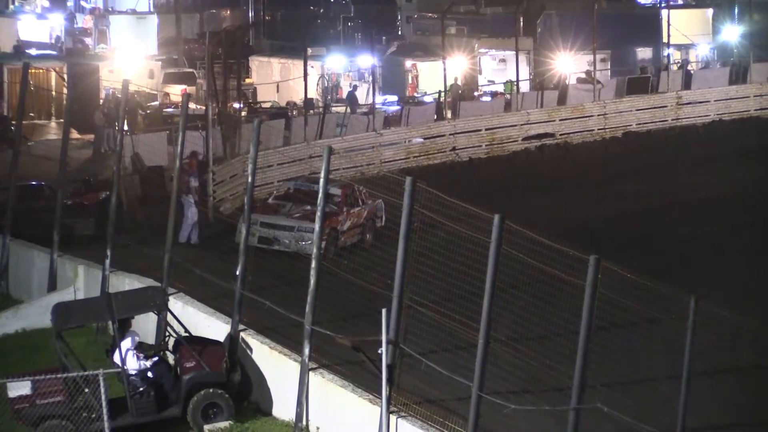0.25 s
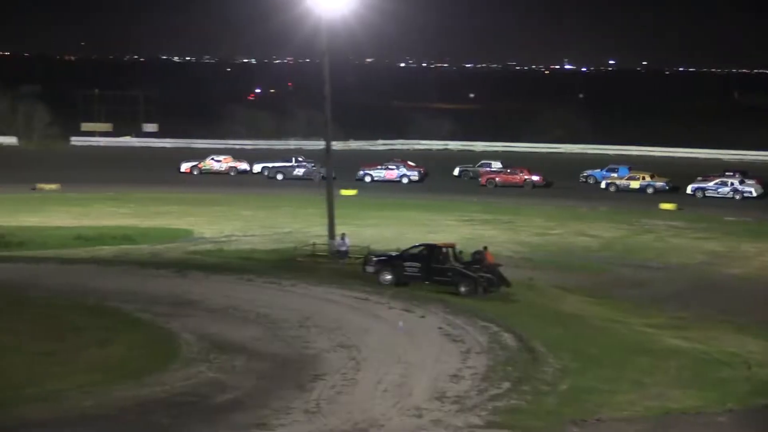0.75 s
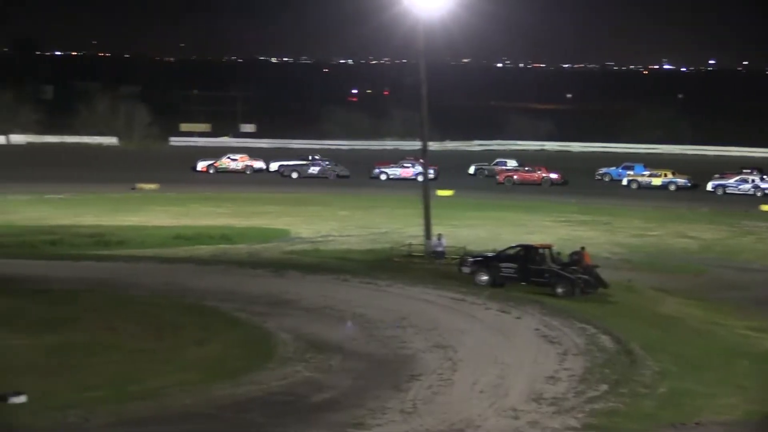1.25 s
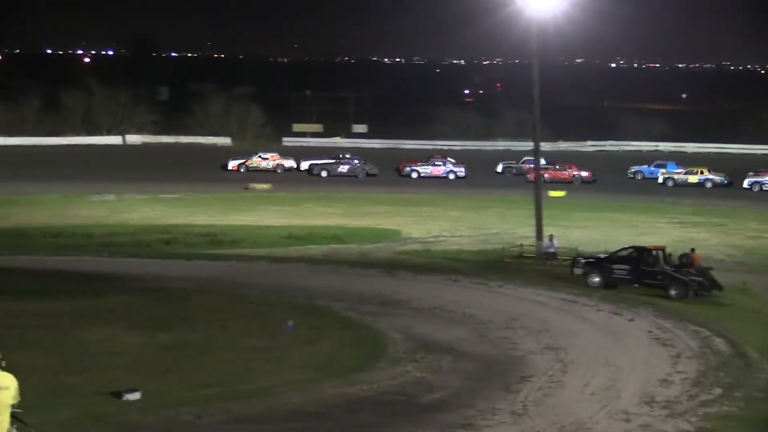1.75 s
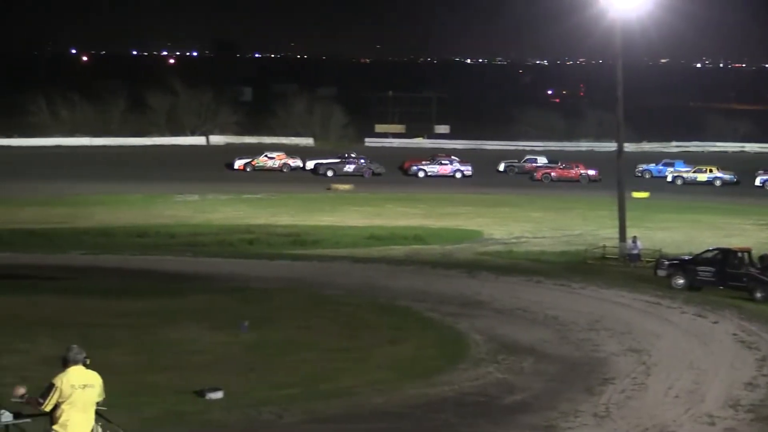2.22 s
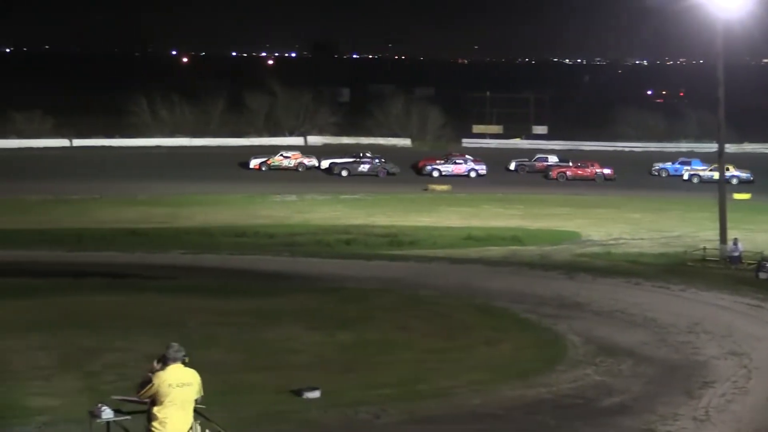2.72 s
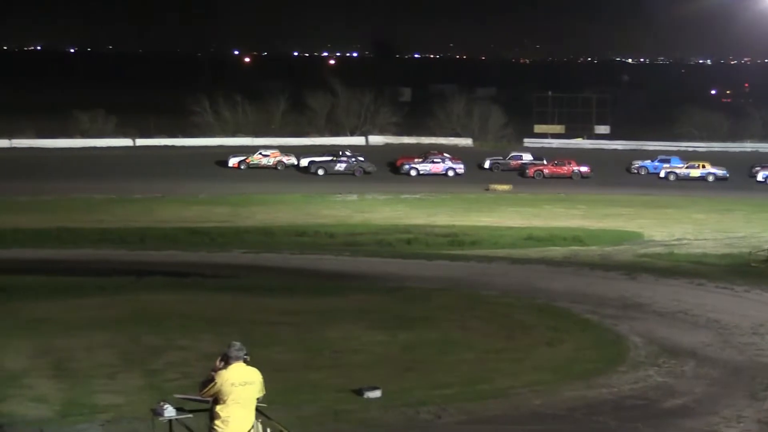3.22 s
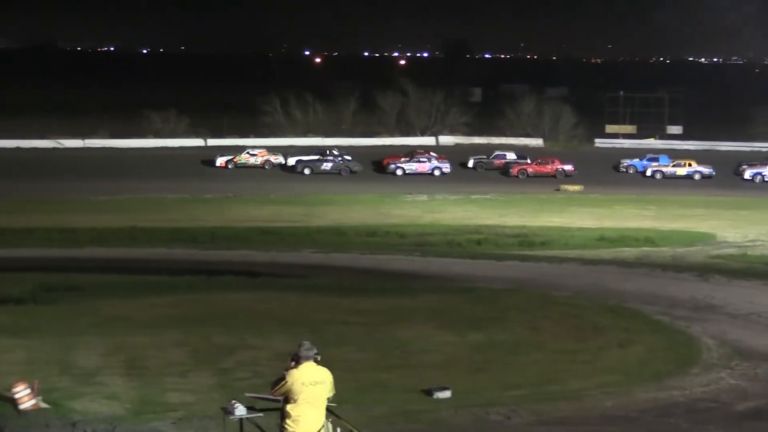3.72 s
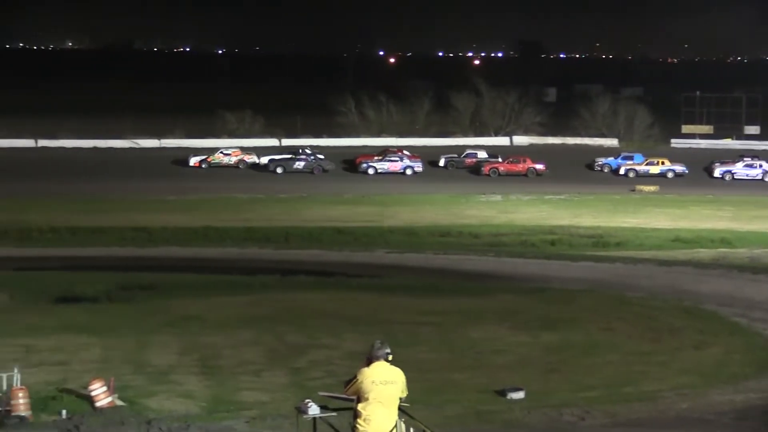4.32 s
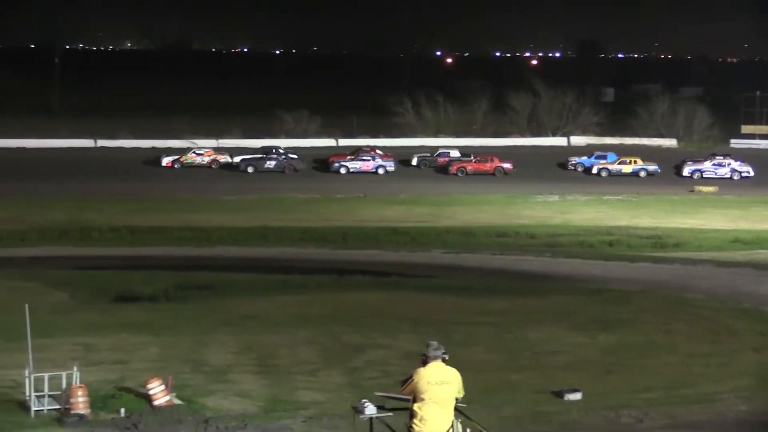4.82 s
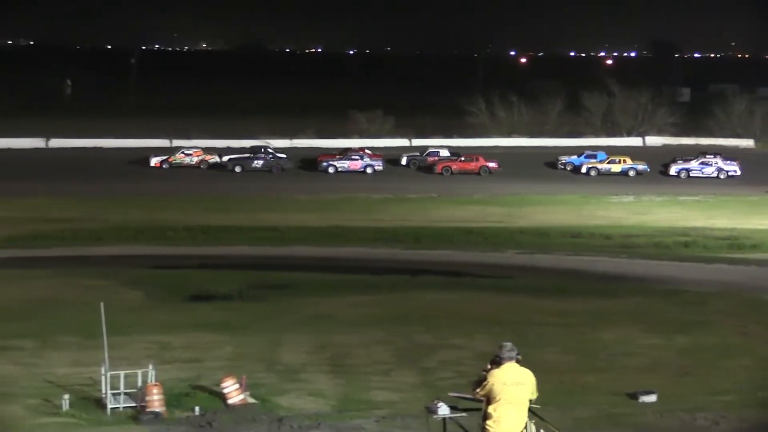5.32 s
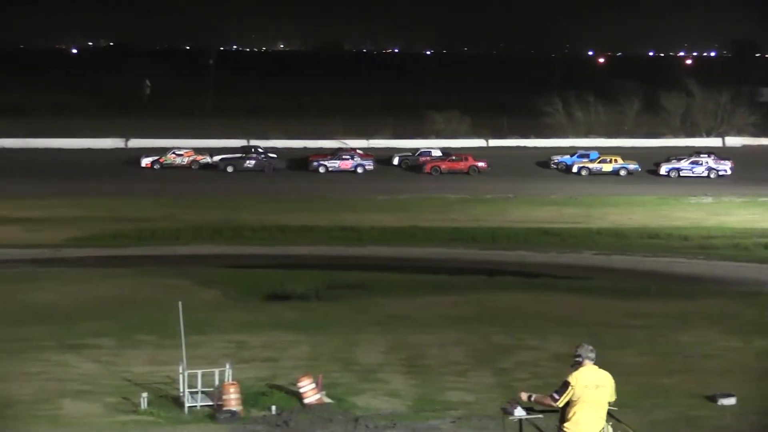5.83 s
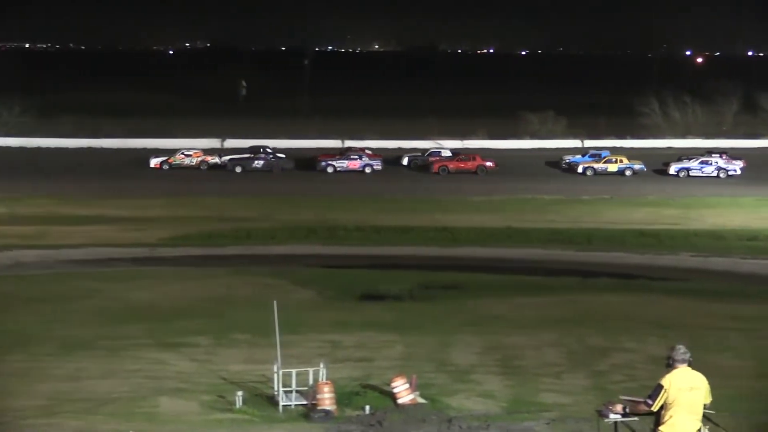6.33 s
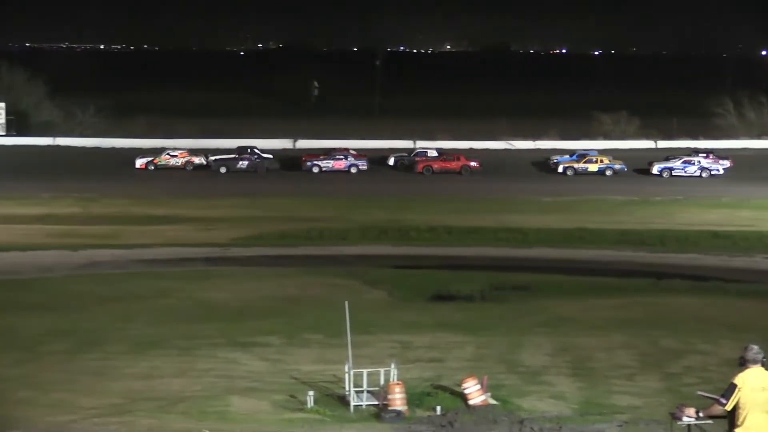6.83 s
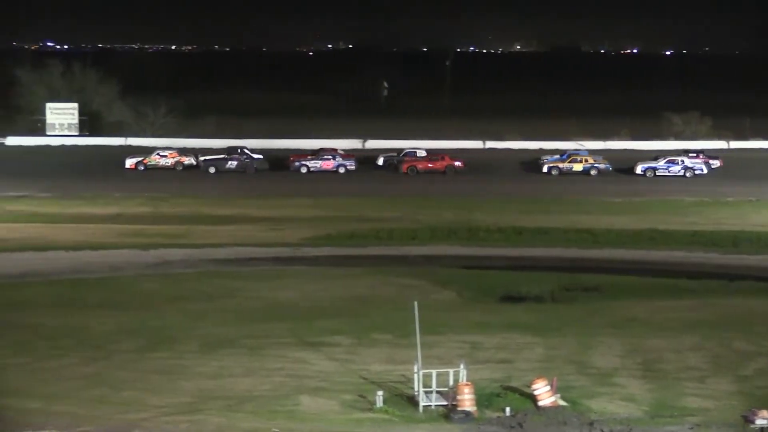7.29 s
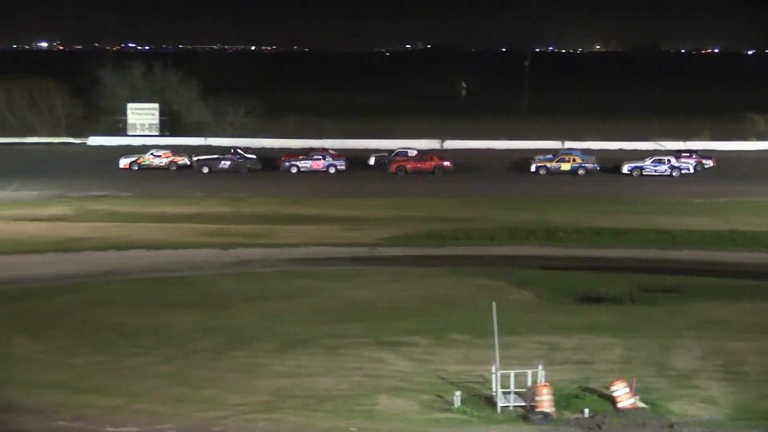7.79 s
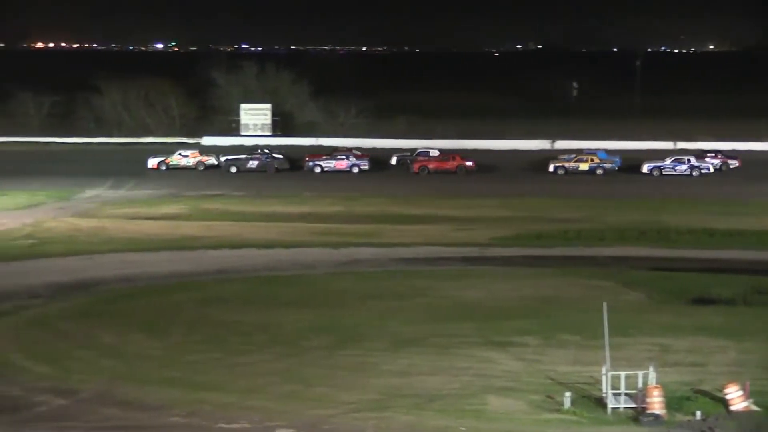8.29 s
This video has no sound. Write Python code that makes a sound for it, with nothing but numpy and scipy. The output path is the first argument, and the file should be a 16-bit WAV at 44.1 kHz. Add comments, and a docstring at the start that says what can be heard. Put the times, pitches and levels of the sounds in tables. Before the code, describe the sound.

A low wind thump opens as a race car engine runs close by, its exhaust booming and its valves clattering. In under a second it cuts off abruptly. Then uneven gusts buffet the microphone with a low rumble, while a field of cars idles far away around an outdoor dirt oval, blurring into a steady drone with a faint, crackling rasp.

```python
"""Night at a dirt oval

First an engine runs steadily close by, its exhaust booming and its valves clattering, while a low
wind thump dies away. After a very short silence a second scene begins: gusty wind buffets the
microphone, and a field of cars idles far away. Their uneven firings blur into a drone and a rasp,
with one open exhaust cracking faintly."""
import sys
import numpy as np
from scipy.fft import rfft, irfft, next_fast_len
from scipy.io import wavfile
from scipy.ndimage import uniform_filter1d, map_coordinates

SR = 44100
rng = np.random.default_rng(int(sys.argv[2]) if len(sys.argv) > 2 else 0)


def file_out(sig):
    """Save sig as 16-bit WAV at sys.argv[1]."""
    # one column per channel
    cols = np.atleast_2d(sig).T
    # limit, then scale
    lim = np.clip(cols, -1, 1)
    pcm = np.round(lim * 32767).astype(np.int16)
    wavfile.write(sys.argv[1], SR, pcm)


N = 377055
TIME = np.arange(N) / SR
FFT_SIZE = next_fast_len(N + 8192)
FFT_HZ = np.fft.rfftfreq(FFT_SIZE, 1 / SR)
FIRST_SCENE, SECOND_SCENE = TIME < 0.6362, TIME > 0.6414  # on/off switches, about 5 ms apart
CYCLE_HZ, EXHAUST_DB = 34.29, -40  # near engine: repeat rate of its firing pattern, base level

# How loud the near engine's parts are. Each row: time in seconds, boom in dB, clatter in dB,
# then the lower and the upper metal ring in dB compared with EXHAUST_DB.
ENGINE_LEVELS = [(0.0, -45, -41, -28, -21), (0.12, -50, -40, -32, -23), (0.22, -42.5, -38.5, -30, -17),
                 (0.28, -39.5, -39.5, -34, -27), (0.34, -38, -38.5, -28, -24), (0.48, -34, -40.5, -17, -29),
                 (0.55, -34.5, -41.5, -26, -30), (0.64, -33, -39, -30, -25)]
def near_engine():
    """An engine close by: exhaust and valves follow one cycle, with loud clanks on top."""
    boom_db, clatter_db, *ring_db = curves(ENGINE_LEVELS)
    angle = 2 * np.pi * CYCLE_HZ * TIME
    return exhaust(angle, boom_db) + valve_clatter(angle, clatter_db, ring_db) + valve_clanks()


# The exhaust's tones. Each row: multiple of the cycle rate, relative level in dB.
EXHAUST_TONES = [(1, -28), (2, -41), (3, -16), (4, -10.5), (5, 0), (6, -8), (7, -11), (8, -20), (9, -21),
                 (10, -18), (11, -18.5), (12, -23), (13, -9.5), (14, -16), (15, -14), (16, -21.5),
                 (17, -17), (18, -23), (19, -15.5), (20, -21.5), (21, -22), (22, -31), (23, -28), (24, -28),
                 (25, -24.5), (26, -30), (27, -31), (28, -25.5), (29, -41), (30, -48), (31, -46), (32, -31),
                 (33, -52), (34, -37), (35, -35), (36, -24)]
# The noise between those tones. Each row: frequency in Hz, relative level in dB.
EXHAUST_COLOUR = [(35, -46), (60, -13), (174, 1.5), (228, -2.5), (319, -9), (446, -9.5), (651, -7),
                  (1030, -18), (1500, -15), (1950, -53), (3300, -120)]
def exhaust(angle, boom_db, boom_multiple=5):
    """Repeating firings make clean tones over puffing noise; one tone booms at its own level."""
    tones = np.zeros(N)
    for multiple, db in EXHAUST_TONES:
        if multiple != boom_multiple:  # each tone swells and fades on its own, for one second
            level = amp(db + 3.7 * wobble(7.7, size=SR))
            phase = 0.34 * wobble(12.8, size=SR) + rng.normal(np.pi / 2, 1.55)
            tones[:SR] += level * np.sin(multiple * angle[:SR] + phase)
    puffing = coloured(amp(1.8 * np.cos(angle)) * noise(), EXHAUST_COLOUR)
    boom_level = np.sqrt(2) * amp(boom_db + 1.7 * wobble(23.8))
    boom = boom_level * np.sin(boom_multiple * angle + 0.18 * wobble(30.4))
    return amp(EXHAUST_DB) * (amp(5.5) * tones + amp(-2) * puffing) + boom


# The clatter and its high sheen. Each row: frequency in Hz, relative level in dB.
CLATTER_COLOUR = [(590, -34), (1000, -20), (1200, -5), (1430, -24), (1610, -3), (1940, -6), (2140, -1.5),
                  (2420, -6), (2960, 0), (3520, -5.5), (4390, 1), (4820, -5.5), (5140, -9.5), (7490, -13),
                  (9000, -27), (11700, -48), (19800, -120)]
SHEEN_COLOUR = [(4120, -31), (7000, -13.5), (7530, 7), (9020, -7), (9620, -7), (11100, -11), (12600, -1),
                (13300, -11), (14900, -9), (15600, -24)]
# The rings of thin metal. Each row: pitch in Hz, width in Hz.
METAL_RINGS = [(9700, 720), (11100, 1100)]
def valve_clatter(angle, clatter_db, ring_db):
    """Valve noise swells once and three times a cycle, and thin metal rings along."""
    beat = amp(0.48 * np.cos(angle) + 1.6 * np.cos(3 * angle) + 1.24 * wobble(38.6))
    grit = beat * amp(2.6 * wobble(70))
    clatter = coloured(beat * noise(), CLATTER_COLOUR)
    sheen = amp(-22) * coloured(grit * noise(), SHEEN_COLOUR)
    rings = sum(amp(EXHAUST_DB + db) * resonant(grit ** 1.1 * noise(), [(hz, width, 0)])
                for (hz, width), db in zip(METAL_RINGS, ring_db))
    return amp(clatter_db) * (clatter + sheen) + rings


# The loudest clanks. Each row: start in seconds, level in dB, pitch in Hz,
# overtone in dB compared with that level.
VALVE_CLANKS = [(0.038, -33, 4430, -15), (0.0876, -37, 4370, -1.5), (0.151, -38, 4040, -15),
                (0.179, -30, 4310, -13), (0.2142, -29, 4610, -18), (0.2362, -29, 4440, -20),
                (0.2625, -38, 4050, -20), (0.2846, -39, 4260, -24), (0.3224, -27.5, 4190, -9),
                (0.3527, -27, 4440, -14), (0.383, -37, 4600, -10), (0.416, -31.5, 4380, -8),
                (0.4682, -32, 4530, -6)]
def valve_clanks():
    """Each hard valve strike rings briefly, with a higher overtone."""
    out = np.zeros(N + SR)
    for start, db, hz, overtone_db in VALVE_CLANKS:
        add_ring(out, start, db, hz, fade_s=0.055, rough=0.18)
        add_ring(out, start, db + overtone_db, rng.uniform(6800, 7800), fade_s=0.057, rough=0.33)
    return out[:N]


# The steady wind. Each row: time in seconds, low push in dB, flutter in dB.
WIND_LEVELS = [(0.65, -44, -36.5), (0.85, -39.5, -38), (1.16, -43, -49), (1.57, -31, -32), (1.79, -40, -47),
               (2.21, -55, -51.5), (2.47, -49, -44), (2.69, -31.5, -39), (3.29, -33.5, -31.5),
               (3.51, -36, -49), (3.71, -41.5, -49), (3.99, -36, -37), (4.28, -42.5, -56.5),
               (4.72, -40, -47.5), (5.64, -37, -44), (6.64, -45, -45.5), (6.81, -54, -49),
               (7.1, -43.5, -48.5), (7.67, -53, -56), (7.89, -38, -49), (8.22, -46.5, -54),
               (8.55, -39.5, -46)]
# The strongest eddies (swirls of air). Each row: time of the peak in seconds, level in dB,
# flutter in dB compared with that level, length in seconds.
STRONG_EDDIES = [(0.698, -26, -7, 0.071), (0.894, -29.5, -3.5, 0.06), (1.087, -33, -5, 0.14),
                 (1.31, -29.5, -6, 0.075), (1.489, -23, -10, 0.05), (1.657, -29.5, -12, 0.16),
                 (1.9, -42, -6, 0.054), (2.574, -22, -15, 0.085), (2.85, -27.5, -13, 0.066),
                 (3.012, -29, -9, 0.042), (3.181, -20, -6.5, 0.046), (3.479, -27, -2.5, 0.074),
                 (3.646, -28.5, 4.5, 0.031), (3.768, -31.5, -7, 0.061), (3.962, -27, 0, 0.053),
                 (4.081, -28.5, -8.5, 0.12), (4.304, -32.5, -10, 0.047), (4.395, -34.5, -20, 0.052),
                 (4.488, -31, -16, 0.073), (4.598, -34.5, -2.5, 0.14), (4.747, -32, -5, 0.062),
                 (4.981, -26.5, -11, 0.059), (5.243, -31, -19, 0.21), (5.338, -31.5, -6, 0.029),
                 (5.608, -27.5, -13, 0.066), (5.705, -28, -13.5, 0.042), (5.812, -30, -2, 0.084),
                 (6.029, -28, -6, 0.039), (6.155, -31, -10, 0.09), (6.32, -38.5, -8, 0.11),
                 (6.445, -33.5, -11, 0.037), (6.567, -30.5, -11, 0.07), (6.73, -40.5, -3, 0.107),
                 (6.85, -34, -14, 0.028), (6.976, -43, -9, 0.14), (7.773, -27.5, -10, 0.045),
                 (7.846, -32.5, -11, 0.071), (8.008, -32, -18, 0.057), (8.148, -36, -16, 0.078),
                 (8.45, -34, -3, 0.045)]
# The low push and the flutter. Each row: frequency in Hz, relative level in dB.
PUSH_COLOUR = [(8.8, -50), (15, -7.5), (43, 2.5), (85, 3.5), (124, -7), (200, -21.5), (260, -58),
               (440, -120)]
FLUTTER_COLOUR = [(41, -14), (70, -2), (126, -2.5), (189, -13), (247, -25.5), (303, -33.5), (437, -45.5),
                  (540, -53), (700, -47), (910, -84), (1540, -120)]
def wind():
    """Small random eddies push on the microphone, strong ones swell past, and a flutter trembles."""
    push_level, flutter_level = (amp(db + 3 * wobble(14)) for db in curves(WIND_LEVELS))
    eddy_push, eddy_flutter = np.zeros((2, N))
    for peak, db, flutter_db, length in STRONG_EDDIES:
        span = slice(round((peak - 2 * length) * SR), round((peak + 2 * length) * SR))
        bump = np.exp(-(2 * (TIME[span] - peak) / length) ** 2)
        eddy_push[span] += amp(db) * bump
        eddy_flutter[span] += amp(db + flutter_db) * bump
    push = evened(coloured(noise(), PUSH_COLOUR), window_s=0.023, share=0.88)
    flutter = evened(coloured(noise(), FLUTTER_COLOUR), window_s=0.05, share=0.86)
    flutter *= amp(2.2 * wobble(35))
    return np.maximum(push_level, eddy_push) * push + np.maximum(flutter_level, eddy_flutter) * flutter


# Puffs of air. Each row: start in seconds, highest level in dB.
AIR_PUFFS = [(2.523, -46.5), (2.58, -52), (2.64, -54), (2.976, -47.5), (3.027, -54), (3.62, -64),
             (3.824, -59)]
# Their tone colour. Each row: frequency in Hz, relative level in dB.
AIR_COLOUR = [(150, -22), (250, 7.5), (400, -0.5), (650, -18), (1000, -47), (2000, -120)]
def air_puffs(rise_s=0.015):
    """Hard eddies burst with a short puff, higher than the wind's rumble."""
    level = np.zeros(N)
    for start, db in AIR_PUFFS:
        age = np.clip(TIME - start, 0, 1) / rise_s
        level += amp(db) * age * np.exp(1 - age) * (age < 12)
    return level * coloured(noise(), AIR_COLOUR)


# The thump's low tones. Each row: pitch in Hz, starting level in dB, seconds to fade by 60 dB.
THUMP_TONES = [(109.9, -17.5, 0.33), (55.7, -18.5, 0.093), (181, -16.5, 0.17)]
# The rumble under them. Each row: time in seconds, level in dB.
RUMBLE_LEVELS = [(0.0, -16), (0.064, -45), (0.14, -42), (0.3, -50)]
def wind_thump():
    """A low wind thump opens the scene: three quickly fading low tones over a soft rumble."""
    tones = sum(amp(db - 60 * TIME / fade_s) * np.sin(2 * np.pi * hz * (TIME + 0.01185))
                for hz, db, fade_s in THUMP_TONES)
    return tones + amp(curves(RUMBLE_LEVELS)[0]) * coloured(noise(), PUSH_COLOUR)


# The far cars' firing rates in Hz, one for each car.
FIRING_RATES = [53.95, 60.37, 67, 75.84, 86.3, 94.5, 103.76]
# Their drone. Each row: time in seconds, level in dB.
DRONE_LEVELS = [(0.65, -44), (1.4, -46), (2.2, -48.5), (2.6, -45), (3.6, -47), (4.6, -47.5), (6.1, -49.5),
                (8.55, -48)]
# Their rasp. Each row: time in seconds, middle band in dB, then the bright and the dull band
# in dB compared with the middle one.
RASP_LEVELS = [(0.65, -61.5, -5, -3), (1.37, -67.5, -5, 0.5), (1.84, -67, -5, -3),
               (2.21, -63.5, -8.5, -6.5), (2.39, -64.5, -4.5, -4), (2.63, -65, -6, -3),
               (2.76, -63, -7, -3.5), (3.29, -69, -4.5, -1.5), (3.47, -62, -10, -2.5), (3.71, -61, -9, -8),
               (3.95, -65.5, -6, 0.5), (4.34, -63.5, -8.5, -3), (4.52, -67, -5.5, -3.5),
               (4.83, -66, -7.5, -4.5), (5.53, -68.5, -3.5, -2.5), (6.39, -65, -7, -2.5),
               (6.57, -69, -3, -3), (6.61, -64, -4, -6), (6.85, -67, -5, -1), (7.14, -62.5, -7.5, -4.5),
               (7.18, -65.5, -4.5, 1.5), (7.87, -71, -4, -3), (8.35, -70, -4.5, 2), (8.55, -65, -5, -3)]
# The drone and the three bands of rasp. Each row: frequency in Hz, relative level in dB.
DRONE_COLOUR = [(18, -43), (30, -13), (59, -18), (81, -7), (155, -1), (178, -6.5), (244, -6), (277, -13),
                (310, -17.5), (351, -18.5), (424, -22), (600, -24), (1300, -39.5), (1690, -43.5),
                (2860, -120)]
MIDDLE_COLOUR = [(1350, -10), (2300, -0.5), (3540, 1), (4100, -5.5), (5330, -60), (9020, -120)]
BRIGHT_COLOUR = [(2290, -25), (3900, 0), (4000, -1), (4390, 5), (5230, 2.5), (5800, -3.5), (6440, -6.5),
                 (7080, -2.5), (8500, -19.5), (11000, -32), (18700, -120)]
DULL_COLOUR = [(590, -23), (1000, -18), (1300, -3), (1750, 2.5), (2400, -5.5), (3120, -20), (5280, -120)]
def far_cars():
    """Uneven firings of many cars blur into a drone; distance smears their rasp into a wash."""
    drone_db, = curves(DRONE_LEVELS)
    rasp_db, bright_db, dull_db = curves(RASP_LEVELS)
    pulses = sum(firings(hz, jitter=0.06, spread_db=3.5) for hz in FIRING_RATES)
    drone = coloured(unit(pulses) + 0.72 * noise(), DRONE_COLOUR)
    pulse_tail = np.exp(-np.arange(900) / 180)
    puffing = 1.2 + unit(np.convolve(pulses, pulse_tail)[:N])
    puffing *= amp(0.56 * wobble(14))
    middle = coloured(puffing * noise(), MIDDLE_COLOUR)
    bright = coloured(puffing * amp(0.85 * wobble(21)) * noise(), BRIGHT_COLOUR)
    dull = coloured(puffing * amp(0.88 * wobble(9.1)) * noise(), DULL_COLOUR)
    rasp = middle + amp(bright_db) * bright + amp(dull_db) * dull
    return notched(amp(drone_db) * drone + amp(rasp_db) * rasp + exhaust_cracks(rasp_db))


# The loudest cracks. Each row: start in seconds, level in dB, pitch in Hz,
# then a high ring and a lower ring in dB compared with that level.
LOUD_CRACKS = [(0.6794, -51, 4590, -2, -4), (0.7128, -56, 3700, -13, -3), (0.7314, -48, 5120, -8, -8),
               (0.7517, -48.5, 3970, -18, -5), (0.7856, -48.5, 5360, -18, -7), (0.818, -56, 5300, -13, -8),
               (1.6901, -55, 4450, -17, 0), (1.9395, -51, 3750, -14, -8), (2.1271, -48, 3700, -18, -2),
               (2.1804, -55, 3880, -17, 2), (2.2842, -47.5, 5350, -16, -10), (2.3346, -48, 3810, -19, -15),
               (2.3535, -46, 4300, -12, -11), (2.387, -53, 5280, -20, -5), (2.4074, -50, 3790, -23, -11),
               (2.4404, -44, 4810, -24, -10), (2.4594, -52, 4460, -22, -6), (2.7472, -59, 4940, -18, -2),
               (2.7661, -57, 5290, -13, 4), (2.7816, -56, 3710, -22, -6), (2.816, -57, 5310, -18, -3),
               (2.8594, -62, 5240, -12, -4), (2.8998, -53, 4490, -6, -5), (2.9183, -50, 5190, -7, -5),
               (2.9701, -50, 4510, -16, -6), (3.0031, -49, 4750, -11, -6), (3.555, -50, 3830, -17, 4),
               (3.6217, -54, 4230, -19, -4), (3.6865, -58, 4360, -18, 3), (3.7304, -57, 5030, -20, -4),
               (4.0312, -54, 3720, -19, 0), (4.3789, -55, 4190, -21, 4), (4.8045, -57, 4400, -17, -2),
               (5.6256, -53, 4250, -22, -10), (5.6441, -52, 4540, -20, -8), (5.695, -51, 3700, -19, -4),
               (5.7473, -51.5, 4240, -19, -4), (6.5834, -54, 4240, -20, -3), (6.6847, -49, 4340, -18, -6),
               (6.7271, -51, 4460, -19, -6), (7.0484, -55, 4480, -19, -5), (7.0788, -57, 3730, -18, -5),
               (7.4894, -51, 4300, -16, -7)]
def exhaust_cracks(rasp_db, firing_hz=57.75):
    """One open exhaust cracks at each firing, mostly buried in the wash; some cracks snap brightly."""
    out = np.zeros(N + SR)
    draws = rng.standard_normal((int(N / SR * firing_hz) - 1, 3))
    for k, (late, size, pitch) in enumerate(draws):
        start = abs(k + 0.12 * late) / firing_hz
        db = rasp_db[round(start * SR)] + 6.5 + 3 * np.tanh(size)
        hz = 2900 * np.exp(0.402 * np.tanh(pitch))
        add_ring(out, start, db, hz, fade_s=0.016, rough=0.28)
    for start, db, hz, high_db, low_db in LOUD_CRACKS:
        add_ring(out, start, db, hz, fade_s=0.012, rough=0.4)
        add_ring(out, start, db + high_db, hz=7200, fade_s=0.013, rough=0.15)
        add_ring(out, start, db + low_db, hz=3100, fade_s=0.021, rough=0.32)
    return out[:N]


# The far exhausts' tones. Each row: pitch in Hz, width in Hz, relative level in dB.
UPPER_HUMS = [(373.7, 32, 3.5), (571, 44, -1), (759, 35, -3), (1185, 26, -9.5)]
LOWER_HUM = [(239, 29, 0)]
# How loud they are. Each row: time in seconds, upper hums in dB, lower hum in dB.
HUM_LEVELS = [(0.65, -76, -46.5), (1.3, -73, -56.5), (1.52, -69, -51), (1.62, -77, -44), (1.75, -70, -57),
              (2.45, -73, -56), (2.66, -77, -46), (3, -76, -63), (6.7, -67, -68.5), (7.2, -66, -62),
              (8.55, -64, -71)]
def exhaust_hums(blip_s=1.085, blip_hz=398):
    """Distance and uneven running leave exhaust tones fuzzy; one clear tone peeks out briefly."""
    upper_db, lower_db = curves(HUM_LEVELS)
    upper = amp(upper_db) * resonant(noise(), UPPER_HUMS)
    lower = amp(lower_db) * resonant(noise(), LOWER_HUM)
    blip_level = amp(-53) * np.exp(-((TIME - blip_s) / 0.03) ** 2)
    return upper + lower + blip_level * np.sin(2 * np.pi * blip_hz * TIME)


# Hiss that left and right share, and hiss that is opposite in the two.
# Each row: frequency in Hz, relative level in dB.
SHARED_HISS_COLOUR = [(3530, -24), (6000, -4), (6980, -5), (8030, -3), (14200, -4.5), (15600, -5)]
SIDE_HISS_COLOUR = [(30, -25), (250, -4), (700, 6), (2400, -19), (4400, -8), (6000, 6.5), (15700, 6.5)]
def microphone_hiss():
    """The microphone's own faint hiss, quieter in the first scene."""
    side = amp(-74.5) * coloured(noise(), SIDE_HISS_COLOUR)
    shared = amp(-74) * coloured(noise(), SHARED_HISS_COLOUR)
    return (amp(-19) * FIRST_SCENE + SECOND_SCENE) * (shared + np.array([side, -side]))


def amp(db):
    """Turn dB into a number to multiply by."""
    return 10 ** (np.asarray(db) / 20)


def unit(x):
    """Scale x to an average (rms) level of 1."""
    return x / np.sqrt(np.mean(x ** 2) + 1e-20)


def noise():
    """White noise."""
    return rng.standard_normal(N)


def curves(rows):
    """Join a table's rows with straight lines: one curve for each column after the time."""
    times, *columns = np.transpose(rows)
    return [np.interp(TIME, times, column) for column in columns]


def wobble(rate, size=N):
    """A smooth curve through `rate` random values a second."""
    points = rng.standard_normal(int(size * rate / SR) + 4)
    return map_coordinates(points, [np.arange(size) * rate / SR])


def firings(hz, jitter, spread_db):
    """One pulse for each firing, scattered in time and size."""
    late, size = rng.standard_normal((int(N / SR * hz), 2)).T
    starts = np.cumsum(1 + jitter * late) / hz
    return np.bincount(np.clip(starts * SR, 0, N).astype(int), amp(spread_db * size), N + 1)[:N]


def add_ring(out, start, db, hz, fade_s, rough):
    """Add a 40 ms ring that falls 60 dB per fade_s; rough blurs its pitch towards noise."""
    t = np.arange(SR // 25) / SR
    blur = rough * np.cumsum(uniform_filter1d(rng.standard_normal(len(t)), size=9))
    level = amp(db - 60 * t / fade_s) * (1 - np.exp(-t / 0.00025))
    out[round(start * SR):][:len(t)] += level * np.sin(2 * np.pi * hz * t + blur)


def filtered(x, gain):
    """Multiply each frequency in x by its gain."""
    return irfft(rfft(x, FFT_SIZE) * gain, FFT_SIZE)[..., :N]


def coloured(x, colour):
    """Give x the tone colour of a table of Hz and dB, at level 1."""
    hz, db = np.transpose(colour)
    return unit(filtered(x, amp(np.interp(np.log(FFT_HZ + 1), np.log(hz + 1), db))))


def resonant(x, peaks):
    """Make x ring at each peak's pitch, at level 1."""
    gain = sum(amp(db) * (FFT_HZ * width) ** 2 / ((hz ** 2 - FFT_HZ ** 2) ** 2 + (FFT_HZ * width) ** 2)
               for hz, width, db in peaks)
    return unit(filtered(x, gain))


def notched(x, hz=3960, half_width_hz=83, depth=0.54):
    """Weaken one narrow band of x."""
    return filtered(x, 1 - depth * np.exp(-((FFT_HZ - hz) / half_width_hz) ** 2))


def evened(x, window_s, share):
    """Take a share of the slow swings in loudness out of x, leaving it at level 1."""
    window = round(window_s * SR)
    power = uniform_filter1d(uniform_filter1d(x ** 2, window), window)
    level = np.sqrt(np.abs(power) + 1e-4)
    return unit(x / level ** share)


def scene():
    """Two scenes in turn. Almost mono, with a faint random left-right flicker."""
    thump = wind_thump()
    buffeting = wind() + air_puffs()
    first = (near_engine() + thump) * FIRST_SCENE
    second = (buffeting + far_cars() + exhaust_hums()) * SECOND_SCENE
    flicker = 0.0016 * wobble(9) ** 3 - 0.009
    side = flicker * (1.6 * thump * FIRST_SCENE + second)
    return first + second + np.array([side, -side])


def record(dry, top_hz=15720):
    """The microphone adds its hiss and passes nothing above top_hz."""
    return filtered(dry + microphone_hiss(), FFT_HZ < top_hz)


dry = scene()
out = record(dry)
file_out(out)
```